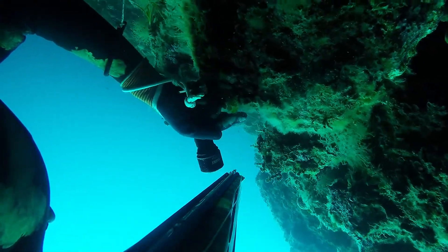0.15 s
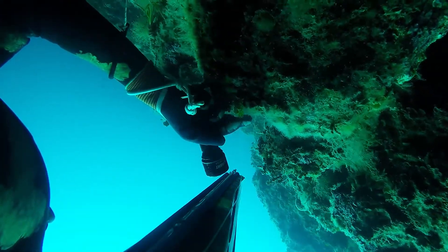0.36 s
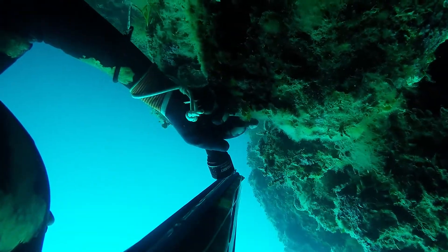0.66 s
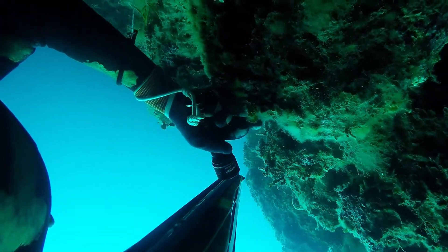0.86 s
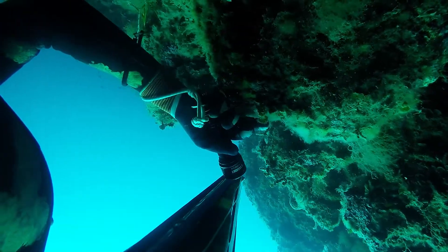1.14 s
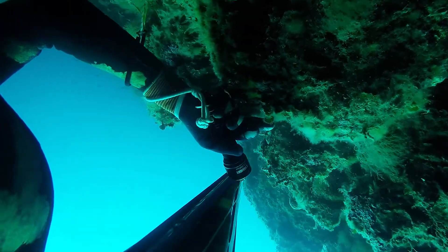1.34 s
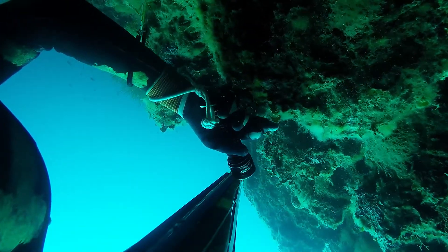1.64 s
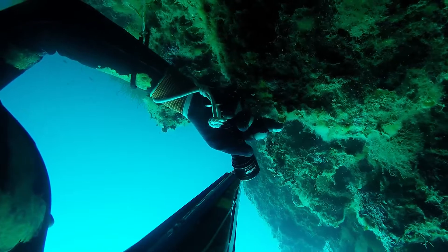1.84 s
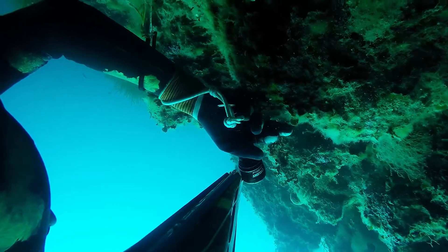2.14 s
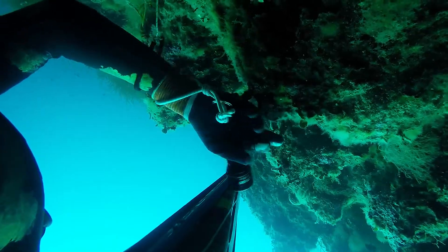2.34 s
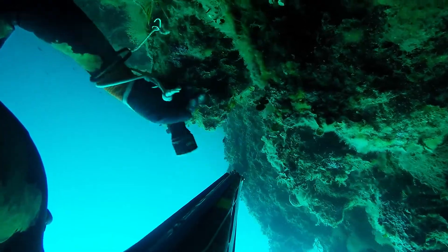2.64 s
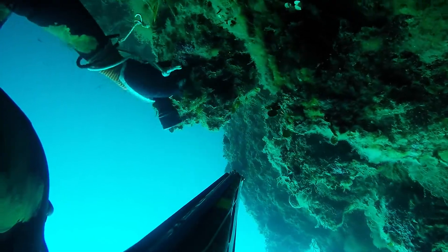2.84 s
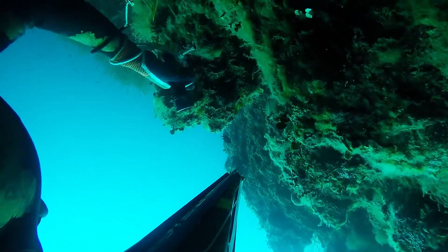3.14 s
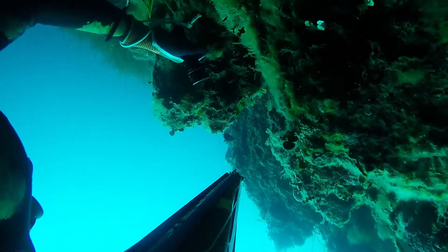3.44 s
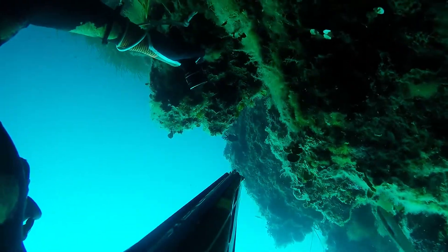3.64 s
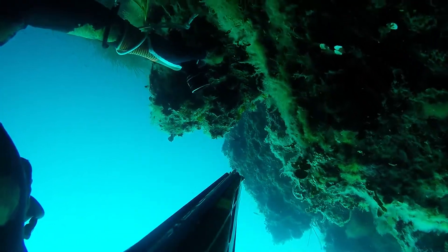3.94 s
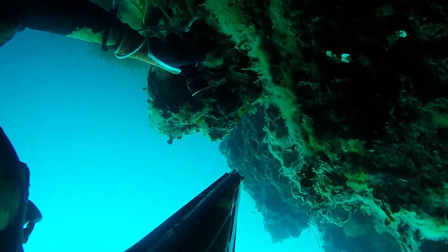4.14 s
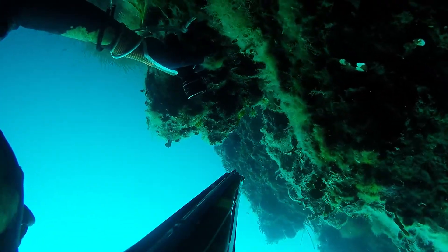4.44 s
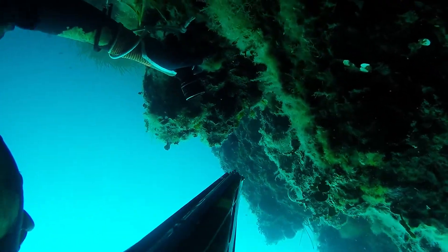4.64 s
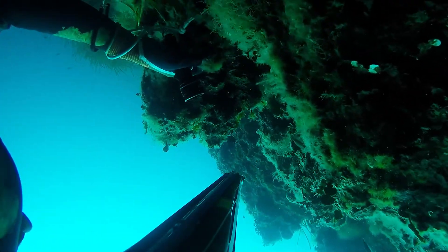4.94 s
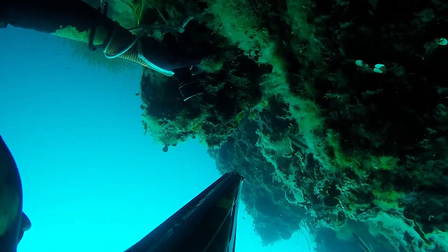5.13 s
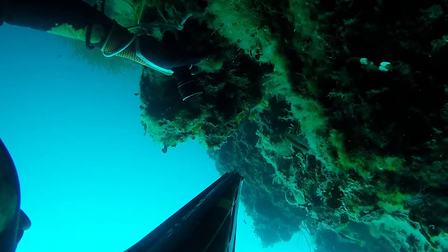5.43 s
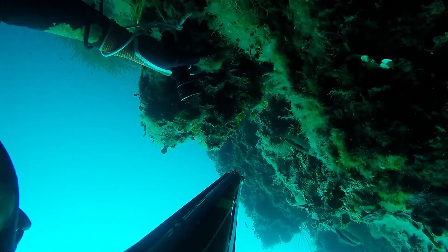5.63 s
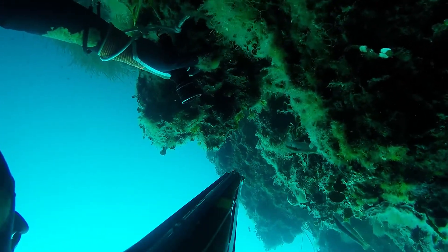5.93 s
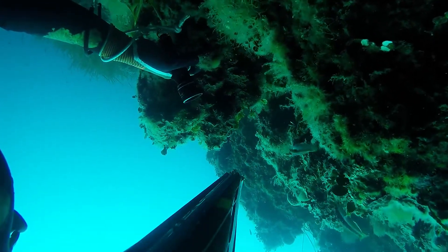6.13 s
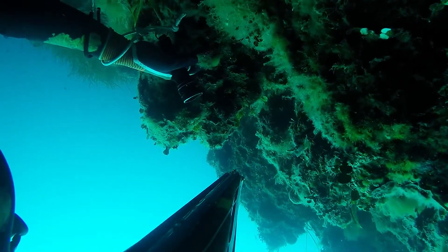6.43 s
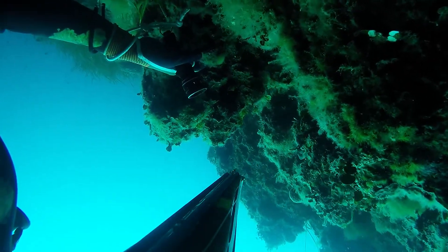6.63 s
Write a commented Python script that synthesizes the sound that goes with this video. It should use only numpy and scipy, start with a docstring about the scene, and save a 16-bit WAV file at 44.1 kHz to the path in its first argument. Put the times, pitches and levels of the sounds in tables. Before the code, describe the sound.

Heard through a camera housing on a speargun, water rumbles quietly and scattered clicks crackle near an underwater rock. A few dull hand knocks and a thin, high sizzle from the focus motor lead to the loudest sound, a hard bump that makes the gun boom and rattle briefly. More knocks, brief gritty glove scrapes and a flurry of snaps follow, then sparser clicking over faint hiss and whine.

```python
"""Under water beside a rock wall, heard through a camera housing on a diver's speargun.
A gloved hand knocks and scrapes on the rock; one hard bump excites the gun's bending modes, and it booms.
Small pressure spikes snap all around and scatter off the rock; the housing wall colours every such snap.
The camera's focus motor sizzles twice, and suit and weed swish softly.
Beneath it all, flowing water rumbles and washes under a faint electronic hiss and whine."""
import sys
import numpy as np
from scipy import signal
from scipy.fft import rfft, irfft, next_fast_len
from scipy.io import wavfile
from scipy.ndimage import uniform_filter1d, map_coordinates

SR = 44100
rng = np.random.default_rng(int(sys.argv[2]) if len(sys.argv) > 2 else 0)


def wav_out(sig):
    """Save sig, one row per channel (or a flat mono array), as 16-bit PCM at SR to the path in sys.argv[1]."""
    wavfile.write(sys.argv[1], SR, np.round(np.clip(np.atleast_2d(sig).T, -1, 1) * 32767).astype(np.int16))


N = 298998

# Contact pulses of the hard bump: (frequency [Hz], envelope peak [dB], delay [s], rise time [s])
BLOW_PULSES = [(147.5, -16.5, .007, .0069), (461, -17, 0.0122, .0042), (670, -16, .0145, 0.0033)]
# Bending modes of the gun: (frequency [Hz], level [dB], free 60 dB decay time [s], rise time [s])
GUN_MODES = [(22.7, -29.5, 1.9, .004), (32.03, -26, 2.1, .004), (54.04, -18, 1, 0.0017),
             (78.75, -19, 0.9, 0.02), (105.3, -10.5, 0.77, 0.064), (135.5, -26, 0.8, 0.0056),
             (149.7, -30, 0.89, 0.0054), (178, -32.5, 0.63, 0.0072), (226, -25.5, 0.29, 0.0034),
             (246.3, -22, 0.324, 0.005), (340.5, -46, 0.28, 0.0018), (436, -31.5, 0.16, 0.0018),
             (508.5, -34.5, 0.44, .002), (535.7, -35.5, 0.45, .002), (647, -54, .28, .002),
             (700, -33.5, 0.37, 0.005), (835, -58, .18, .002), (1185, -57, .16, .002)]
# Spectra of the gun's rattle and crack: (frequency [Hz], level [dB])
RATTLE_SPECTRUM = [(150, 4), (240, 4), (300, -0.5), (430, 2.5), (700, 2.5), (820, -6.5), (1150, -8),
                   (1500, -28), (1850, -15.5), (3000, -21), (4500, -36), (9000, -38)]
CRACK_SPECTRUM = [(900, 0), (1400, -2), (1800, 4), (2300, 0.5), (3000, -9), (4000, -9), (5500, -19),
                  (7000, -13), (9000, -25), (15000, -26)]
# Knocks of the hand: (time [s], thud level [dB], clack relative to thud [dB])
HAND_KNOCKS = [(1.193, -45.5, -16), (1.441, -36, -0.5), (1.493, -36, -21), (1.512, -37.5, -20),
               (2.051, -51, 8), (2.425, -35, 2), (2.534, -38, 9), (2.972, -38, -17), (3.381, -38.5, -8.5),
               (3.632, -21.5, -19.5), (3.917, -39.5, -11)]
# Strokes of the glove: (time [s], duration [s], grit level [dB], rub relative to grit [dB])
GLOVE_STROKES = [(0.239, .025, -67.5, 4.5), (0.928, 0.024, -67, 3.5), (1.441, .025, -60, 1),
                 (2.353, 0.018, -44.5, -13), (2.5, 0.034, -50, -12), (2.722, 0.011, -51, -18),
                 (3.491, 0.034, -47, -19), (3.523, 0.059, -53.5, -15), (3.912, 0.07, -63, -1),
                 (3.964, .023, -56, -11), (4.076, .05, -59.5, -2.5), (4.312, 0.033, -56.5, -11),
                 (4.496, 0.1, -62.5, 0), (5.742, 0.048, -57, -16)]
# Friction spectra, high grit and lower rub: (frequency [Hz], level [dB])
GRIT_SPECTRUM = [(1800, -17), (2400, -13), (3600, -9), (4700, 5.5), (5700, -3.5), (7000, -8), (8200, -16),
                 (10500, -13.5), (13500, -26)]
RUB_SPECTRUM = [(900, -3), (1200, -6.5), (1800, -8.5), (2150, -5), (2400, 1.5), (2800, -7), (3600, -13.5)]
# Near snaps: (time [s], level [dB], relative treble level [dB])
NEAR_SNAPS = [(0.017, -44, -10), (0.131, -48, -3), (0.353, -40, -26), (0.832, -37.5, -27), (0.889, -45, -3),
              (0.948, -43, -12), (1.198, -47, -18), (1.3083, -40.5, -15), (1.3469, -36.5, -10),
              (1.405, -41, -7), (1.437, -34.5, -17), (1.6043, -41.5, -8), (2.2363, -43.5, -9),
              (2.5009, -27, -18), (2.738, -40.5, -12), (3.033, -46, -16), (4.0212, -31, -8),
              (4.0657, -39, -11), (4.082, -40, -13), (4.1025, -34.5, -14), (4.1137, -39, -16),
              (4.1314, -49, 0), (4.1754, -34.5, -13), (4.239, -30.5, -25), (4.2972, -41.5, -13),
              (4.829, -34.5, -17), (5.6231, -44, -23), (5.8112, -43, -11.5), (6.0479, -39, -12),
              (6.13, -37, -19), (6.1814, -48.5, -3), (6.4097, -34.5, -24), (6.421, -38.5, -8.5),
              (6.5068, -31.5, -26), (6.595, -33.5, -9.5), (6.7246, -43.5, -12)]
# Middle band of a snap: (frequency [Hz], level [dB])
SNAP_SPECTRUM = [(2300, -15.5), (3100, -9), (3800, -6.5), (4600, -3.5), (5700, 0), (6400, -7), (7000, -7.5),
                 (7900, -13)]
# Spans in which the focus motor is on: (start [s], end [s])
MOTOR_SPANS = [(1.40, 2.365), (6.42, 6.8)]
# Movements of the motor: (time [s], duration [s], level [dB])
MOTOR_MOVES = [(1.354, .018, -58.5), (1.414, .063, -54.5), (1.493, .118, -52.5), (1.656, 0.091, -52.5),
               (1.837, .19, -51.5), (2.056, 0.075, -51), (2.232, .058, -52), (6.496, .05, -56),
               (6.658, .026, -53), (6.697, 0.017, -51.5)]
# Spectra of the idling and the moving motor: (frequency [Hz], level [dB])
IDLE_SPECTRUM = [(7000, -30), (9000, -4), (11200, -24), (11800, 5), (12500, -6), (13100, -6), (14100, -4),
                 (15300, -8.5)]
MOVE_SPECTRUM = [(10900, -22), (11600, -13), (12150, -3), (12570, 4), (12850, -6), (13200, -9),
                 (13700, -12), (15000, -26)]
# Rubs of suit and weed: (time [s], duration [s], relative level [dB], centre frequency [Hz])
SOFT_RUBS = [(0.0, 0.22, -65.5, 370), (0.188, .07, -70.5, 800), (0.583, 0.031, -65, 417),
             (0.926, 0.041, -61.5, 680), (0.982, 0.16, -68, 367), (1.491, 0.062, -54, 268),
             (2.367, 0.052, -60, 580), (3.128, 0.18, -63, 332), (3.809, 0.051, -61.5, 525),
             (4.526, 0.076, -53.5, 474), (4.754, 0.082, -65, 440), (4.878, 0.25, -70, 443)]
# Flow past the housing, in two runs of rows: (time [s], relative rumble [dB], relative wash [dB])
FLOW_LEVELS = [
    [(0.0, -55.5, -66.5), (0.37, -55, -70.5), (0.71, -56, -68.5), (1.08, -55, -63.5), (1.47, -53.5, -67),
     (2.11, -57, -63), (2.33, -55, -64)],
    [(3.05, -50.5, -64), (3.18, -52.5, -64), (3.8, -53, -67), (4.33, -56, -66.5), (5.5, -57, -74),
     (6.62, -55.5, -68), (6.78, -54.5, -67)],
]
# Spectra of the water's rumble and wash and the camera's hiss: (frequency [Hz], level [dB])
RUMBLE_SPECTRUM = [(8.8, -28), (15, 0.5), (27, -1), (43, 0.5), (100, -10), (131, -17), (156, -16.5),
                   (221, -25.5), (320, -26.5), (420, -51), (700, -120)]
WASH_SPECTRUM = [(170, -23), (250, -5.5), (360, -1.5), (430, -3), (560, -5), (675, 3), (780, -16),
                 (1100, -25.5), (1600, -43)]
HISS_SPECTRUM = [(200, -3.5), (800, 1.5), (1400, -0.5), (2400, 0), (5600, -1.5), (6300, -4), (7800, -7),
                 (8700, -2.5), (9300, -7), (11000, -8.5), (15200, -9)]
# Tones of the camera's electronics: (frequency [Hz], relative level [dB])
WHINE_TONES = [(8629, -75), (14088, -91)]
# Resonances and notches of the housing wall: (frequency [Hz], width [Hz], gain [dB])
WALL_BANDS = [(2390, 210, 4.5), (2740, 140, -5), (3134, 99, 7.5), (6990, 200, 4.5), (7680, 620, -6.5),
              (10200, 300, 1), (10500, 150, 2.5)]


def gun_bump(touch_s=2.425, ring_s=2.436, crack_s=2.4505):
    """Modal vibration: a blow sets the gun booming and rattling, a part cracks, the grip damps the modes."""
    out, t = np.zeros(N), clock()
    for hz, db, delay, rise in BLOW_PULSES:
        add(out, touch_s + delay, amp(db) * contact_pulse(hz, rise))
    grip = amp(-7 * np.clip((t - .3) / .04, 0, 1))
    for hz, db, t60, rise in GUN_MODES:
        envelope = amp(db - 60 * t / t60) * (1 - np.exp(-t / rise))
        phase_drift = .18 * wobble(25)
        add(out, ring_s, envelope * grip * np.sin(2 * np.pi * hz * t + phase_drift))
    shake = amp(-37.5 - 60 * t / 0.5 + 2.5 * wobble(65)) * (1 - np.exp(-t / 0.0065))
    add(out, ring_s, shake * noise(RATTLE_SPECTRUM))
    crack = pressure_spike(CRACK_SPECTRUM, t60=0.013, scatter=0.45)
    add(out, crack_s, amp(-15.5) * housing_wall(crack))
    return out


def hand_knocks():
    """Impact excitation: every knock gives the same low thud, with its own share of a short clack."""
    out = np.zeros(N)
    recoil = amp(-5) * contact_pulse(hz=92.7, rise=0.007)  # the whole housing gives way
    thud = contact_pulse(hz=143.7, rise=0.0051) + recoil
    clack = contact_pulse(hz=523, rise=.0022)
    for s, db, clack_db in HAND_KNOCKS:
        add(out, s, amp(db) * (thud + amp(clack_db) * clack))
    return out


def contact_pulse(hz, rise):
    """Damped oscillation: a soft contact swells for rise seconds, then the water quickly damps it."""
    t = np.arange(SR // 8) / SR
    u = t / rise
    return (u * np.exp(1 - u)) ** 2 * np.sin(2 * np.pi * hz * t)


def glove_scrapes(slips_per_s=2500, clumping_db=2.5):
    """Stick-slip friction: each stroke on the crusted rock is a clumped run of tiny slips."""
    slips = rng.standard_normal(N) * (rng.random(N) < slips_per_s / SR)
    slips *= amp(clumping_db * wobble(200))
    grit, rub = np.zeros(N), np.zeros(N)
    for s, length, db, rub_db in GLOVE_STROKES:
        progress = np.linspace(0, 1, round(length * SR))
        pressure = amp(db) * np.abs(np.sin(np.pi * progress ** 0.52))
        add(grit, s, pressure)
        add(rub, s, amp(rub_db) * pressure)
    return grit * unit(ringing(slips, GRIT_SPECTRUM)) + rub * unit(ringing(slips, RUB_SPECTRUM))


def near_snaps(delay_s=0.001174):
    """Discrete transients: each near snap is heard singly, with its own strength and brightness."""
    out = np.zeros(N)
    for s, db, treble_db in NEAR_SNAPS:
        add(out, s + delay_s, amp(db) * snap(treble_db))
    return out


def snap(treble_db, t60=0.011):
    """Broadband impulse: three bands sound together, the treble decaying twice as fast as the others."""
    middle = pressure_spike(SNAP_SPECTRUM, t60, scatter=0.17)
    low = pressure_spike([(2200, -5), (3100, -9)], t60, scatter=0.23)
    treble = pressure_spike([(8500, 1), (10300, 5), (12000, 1), (15000, -9)], t60 / 2, scatter=0.13)
    return middle + amp(-17) * low + amp(treble_db + 3) * treble


def pressure_spike(spectrum, t60, scatter, size=3072):
    """Scattering: the direct spike is followed by a decaying tail of reflections off the rock."""
    t = np.arange(size) / SR
    arrivals = scatter * rng.standard_normal(size) * amp(-60 * t / t60)
    arrivals[0] = 1
    wave = ringing(arrivals, spectrum)
    return 3 * wave / np.linalg.norm(wave)


def focus_motor(step_hz=60, first_pause_s=.0045, pause_share=.22, pause_db=-24):
    """Amplitude modulation: the motor's steps chop a nearly pitched fizz over its thin idling sizzle."""
    paused = ((clock() - first_pause_s) * step_hz) % 1 < pause_share
    steps = uniform_filter1d(amp(pause_db * paused), size=48)
    idle = amp(-65) * sum(gate(start, end, edge=.02) for start, end in MOTOR_SPANS)
    moves = sum(amp(db) * gate(s, s + length, edge=.009) for s, length, db in MOTOR_MOVES)
    return idle * noise(IDLE_SPECTRUM) + moves * steps * amp(1.5 * wobble(80)) * noise(MOVE_SPECTRUM)


def swishes(log_width=0.19):
    """Friction noise: slow rubs of suit and weed each give a hollow, uneven rush in a narrow band."""
    out = np.zeros(N)
    for s, length, db, centre in SOFT_RUBS:
        arch = np.sin(np.linspace(0, np.pi, round(length * SR)))
        white = rng.standard_normal(len(arch))
        rush = filtered(white, lambda hz: 1 / (1 + (np.log((hz + 1) / centre) / log_width) ** 2) ** 1.2)
        add(out, s, amp(db + 2) * arch * unit(rush))
    return out * amp(3 * wobble(45))


def far_crackle(count=260, faintest_db=-58, range_db=13.5):
    """Superposition: many distant snaps merge into a faint crackle; a few nearer ones stand out."""
    out = np.zeros(N)
    for when, nearness, brightness in rng.random((count, 3)):
        strength = amp(faintest_db + range_db * nearness ** 4)
        add(out, when * N / SR, strength * snap(treble_db=-14.5 + 14 * (brightness - .5)))
    return out


def water_flow():
    """Flow noise: slow water rumbles on the housing and washes through weed."""
    t = clock()
    s, rumble_db, wash_db = np.vstack(FLOW_LEVELS).T
    rumble = amp(np.interp(t, s, rumble_db) + 3.5) * noise(RUMBLE_SPECTRUM)
    wash = amp(np.interp(t, s, wash_db) - 0.5 + 2.9 * wobble(30)) * noise(WASH_SPECTRUM)
    return rumble + wash


def camera_electronics():
    """Self-noise: an even hiss and a faint whine whose phase wavers slightly."""
    whine = np.zeros(N)
    for hz, db in WHINE_TONES:
        phase = 2 * np.pi * hz * clock() + .12 * wobble(60)
        whine += amp(db + 0.5) * np.sqrt(2) * np.sin(phase)
    return amp(-65.5) * noise(HISS_SPECTRUM) + whine


def housing_wall(x):
    """Resonant transmission: sharp sounds pick up the ring of the housing wall."""
    hz = np.geomspace(1, SR / 2, num=600)
    db = sum(lift_db * np.exp(-((hz - centre) / width) ** 2) for centre, width, lift_db in WALL_BANDS)
    return ringing(x, np.transpose([hz, db]))


def ringing(x, spectrum, size=2048):
    """Convolution: x passes through a minimum-phase body with the given spectrum and unit energy."""
    cepstrum = irfft(np.log(gain(spectrum, np.fft.rfftfreq(size, 1 / SR)) + 1e-5))
    cepstrum[1:size // 2] *= 2  # folding onto positive time makes the response causal
    cepstrum[size // 2 + 1:] = 0
    body = irfft(np.exp(rfft(cepstrum)))
    return signal.fftconvolve(x, body / np.linalg.norm(body))[:len(x)]


def noise(spectrum):
    """Spectral shaping: white noise takes on the given colour, at an rms of 1."""
    return unit(filtered(rng.standard_normal(N), lambda hz: gain(spectrum, hz)))


def filtered(x, response):
    """Linear filtering: the spectrum of x is multiplied by a frequency response."""
    size = next_fast_len(len(x) + 8192)
    return irfft(rfft(x, size) * response(np.fft.rfftfreq(size, 1 / SR)), size)[:len(x)]


def gain(spectrum, hz):
    """Magnitude response: levels interpolated over log frequency, falling steeply beyond the ends."""
    knots, db = np.transpose(spectrum)
    skirt = np.minimum(1, hz / knots[0]) ** 4 * np.minimum(1, knots[-1] / (hz + 1)) ** 4
    return amp(np.interp(np.log(hz + 1), np.log(knots), db)) * skirt


def wobble(rate):
    """Random modulation: a smooth curve through rate knots a second."""
    return map_coordinates(rng.standard_normal(int(N * rate / SR) + 4), [clock() * rate])


def gate(start, end, edge):
    """Trapezoidal envelope: it opens and closes over edge seconds."""
    t = clock()
    return np.clip(np.minimum(t - start, end - t) / edge + .5, 0, 1)


def add(track, s, sound):
    """Superposition: a sound joins the track at s seconds."""
    part = track[round(s * SR):][:len(sound)]
    part += sound[:len(part)]


def amp(db):
    """Amplitude ratio of a level in decibels."""
    return 10 ** (np.asarray(db) / 20)


def unit(x):
    """Normalisation to an rms of 1."""
    return x / np.sqrt(np.mean(x ** 2) + 1e-20)


def clock():
    """Time of each sample in seconds."""
    return np.arange(N) / SR


def scene():
    """Superposition: all sources sum in one channel, snaps and scrapes coloured by the housing wall."""
    sharp = housing_wall(near_snaps() + far_crackle() + glove_scrapes())
    background = water_flow() + camera_electronics() + swishes()
    return (background + sharp + hand_knocks() + gun_bump() + focus_motor())[None]


def record(dry):
    """Band limiting: the camera cuts off steeply in the high treble."""
    cutoff_hz = 15300
    return np.array([filtered(x, lambda hz: 1 / np.sqrt(1 + (hz / cutoff_hz) ** 160)) for x in dry])


dry = scene()
out = record(dry)
wav_out(out)
```